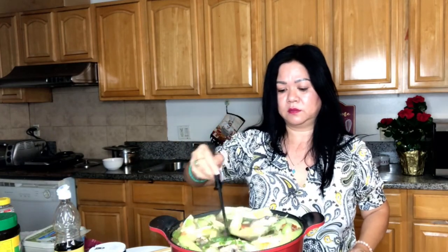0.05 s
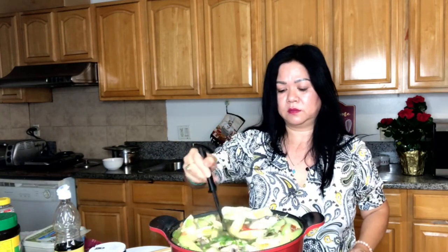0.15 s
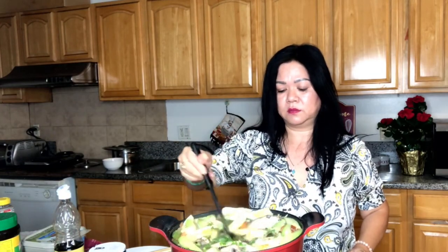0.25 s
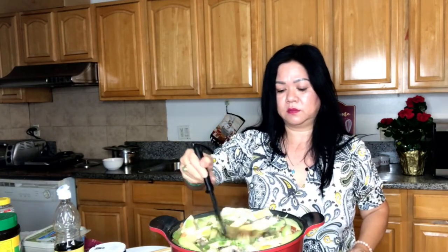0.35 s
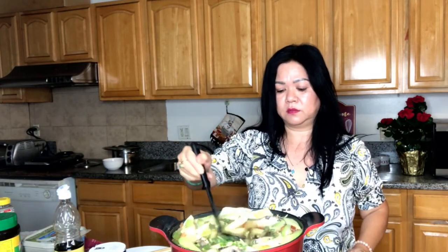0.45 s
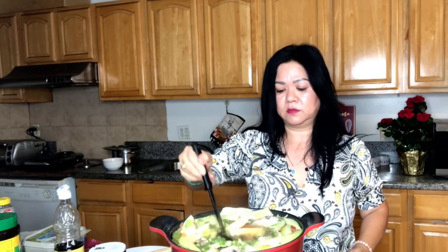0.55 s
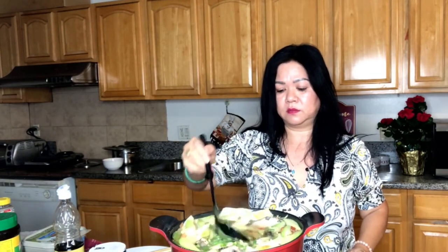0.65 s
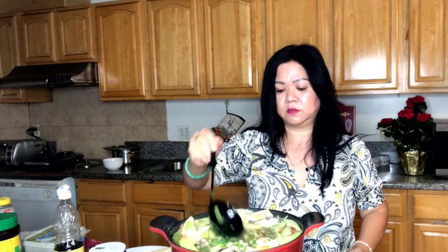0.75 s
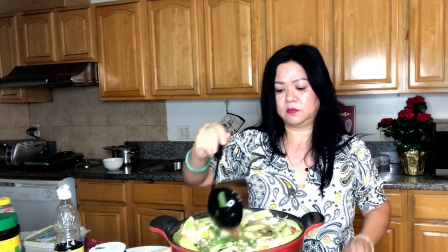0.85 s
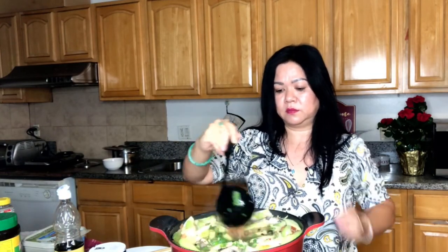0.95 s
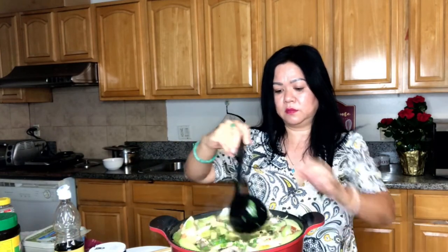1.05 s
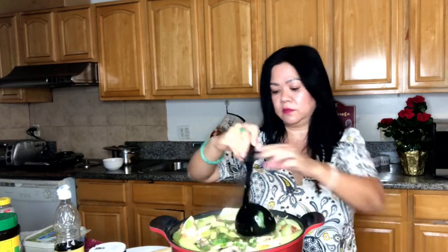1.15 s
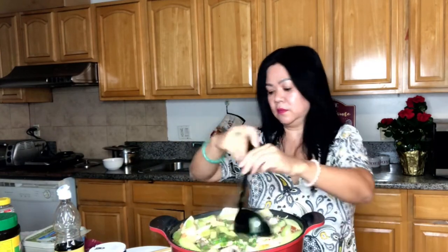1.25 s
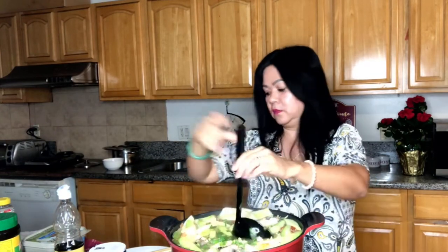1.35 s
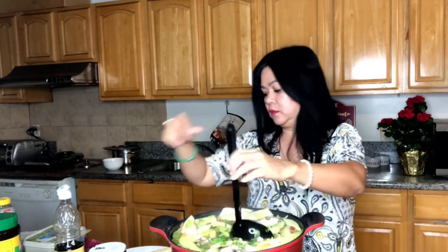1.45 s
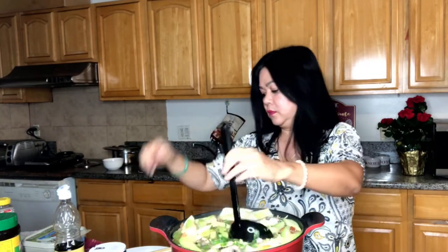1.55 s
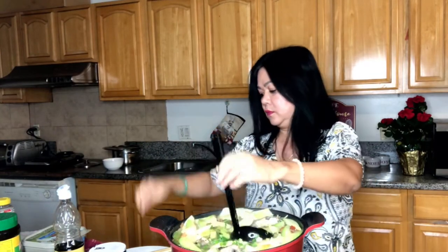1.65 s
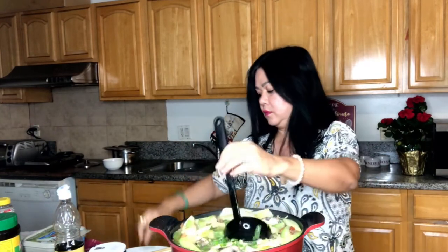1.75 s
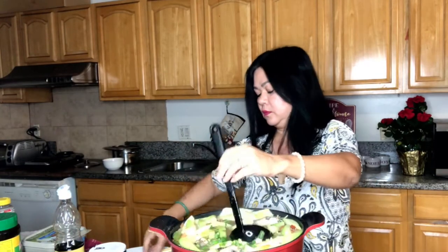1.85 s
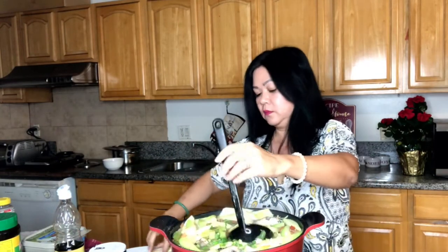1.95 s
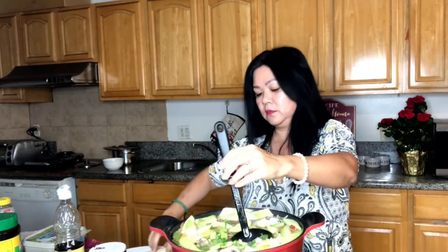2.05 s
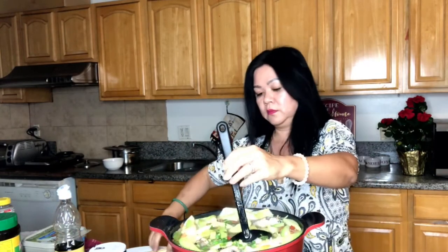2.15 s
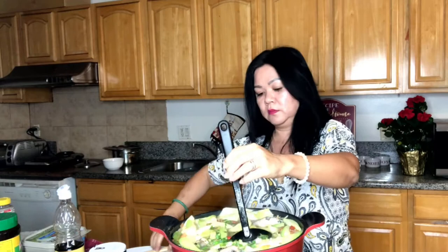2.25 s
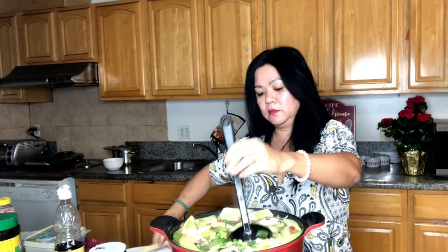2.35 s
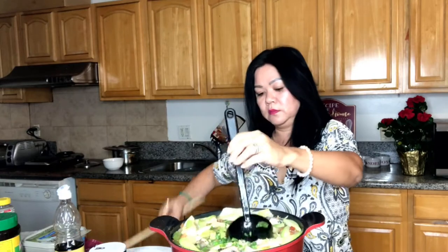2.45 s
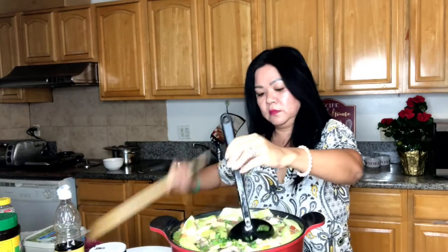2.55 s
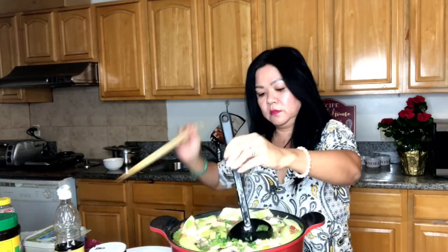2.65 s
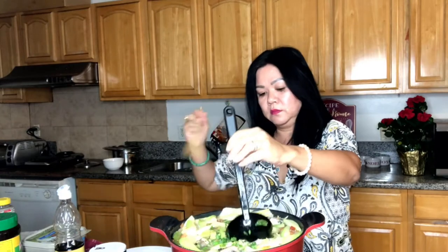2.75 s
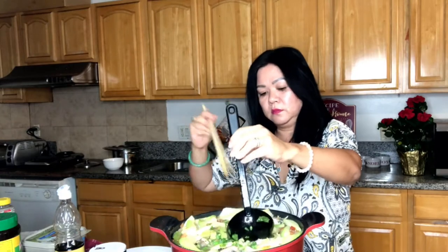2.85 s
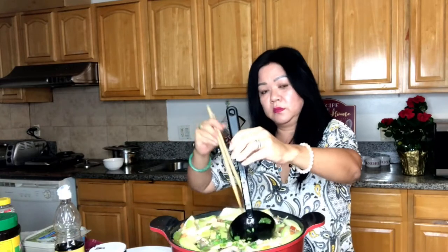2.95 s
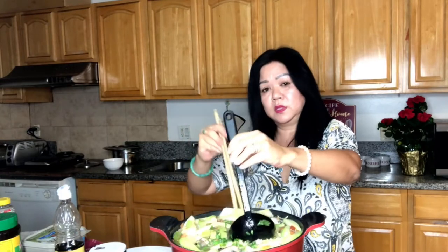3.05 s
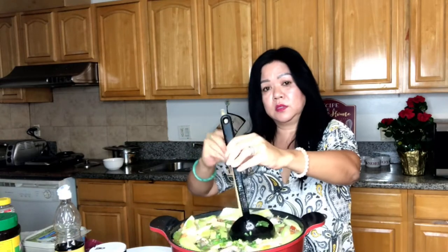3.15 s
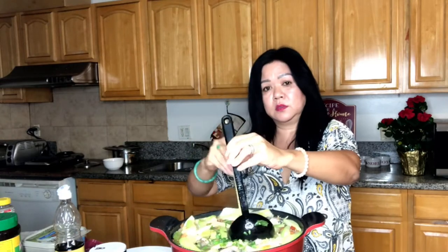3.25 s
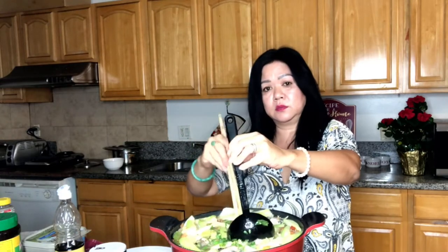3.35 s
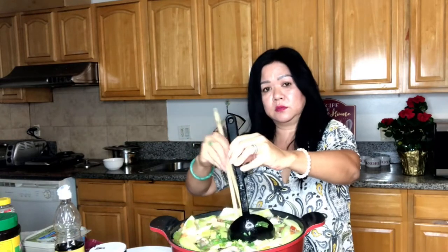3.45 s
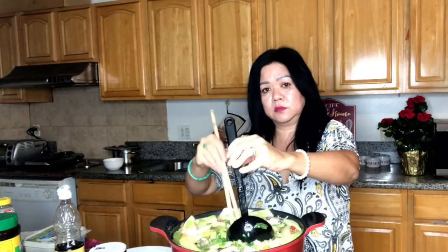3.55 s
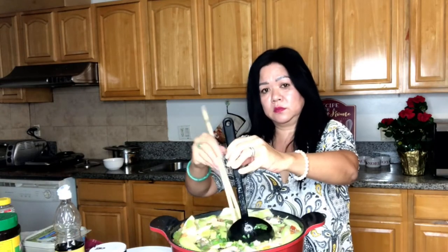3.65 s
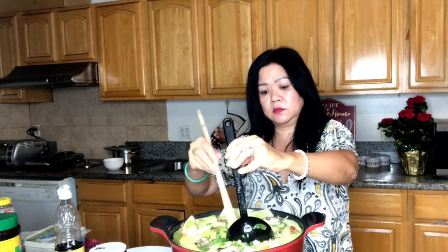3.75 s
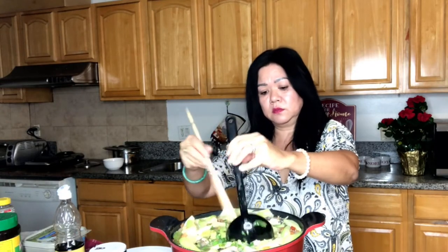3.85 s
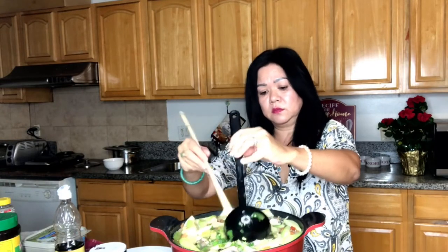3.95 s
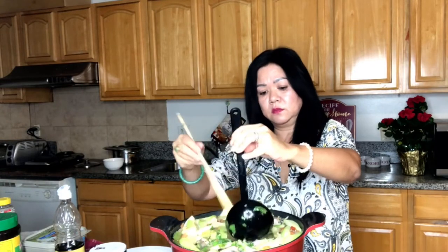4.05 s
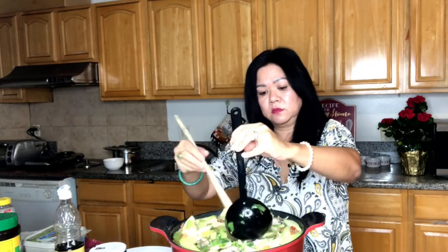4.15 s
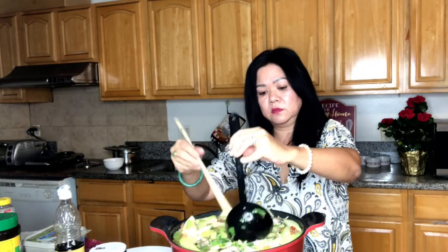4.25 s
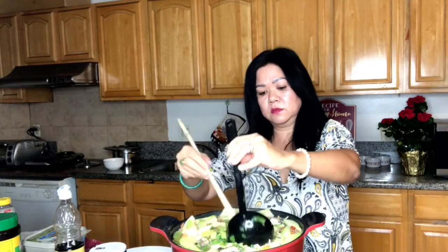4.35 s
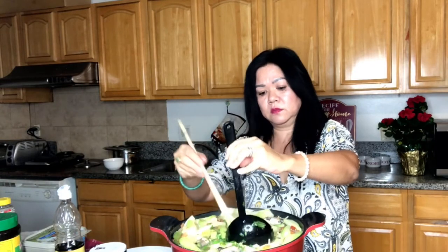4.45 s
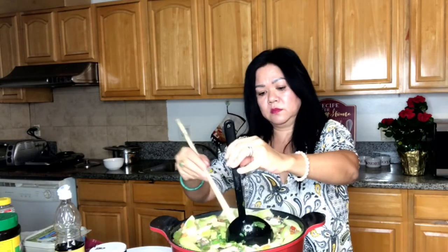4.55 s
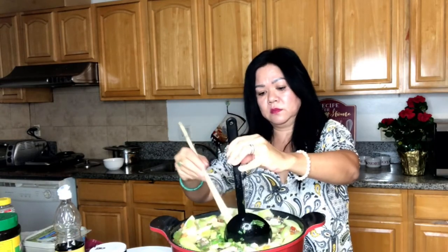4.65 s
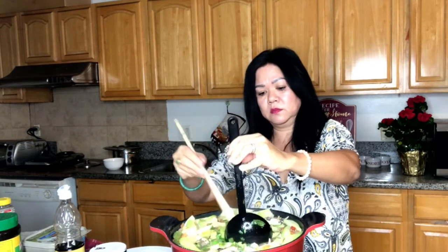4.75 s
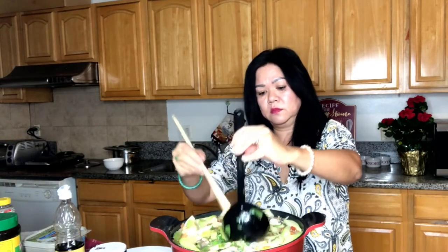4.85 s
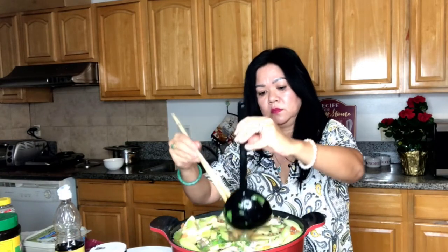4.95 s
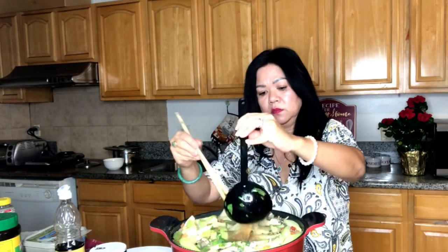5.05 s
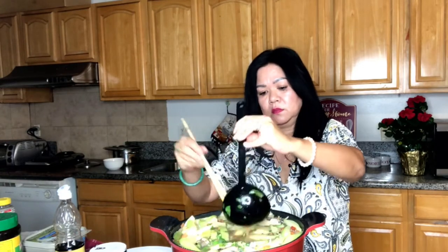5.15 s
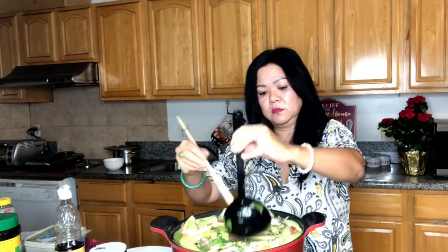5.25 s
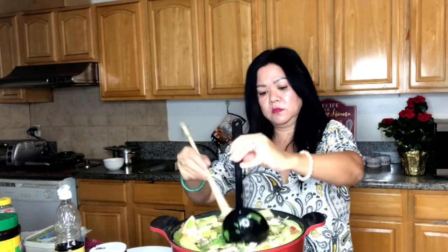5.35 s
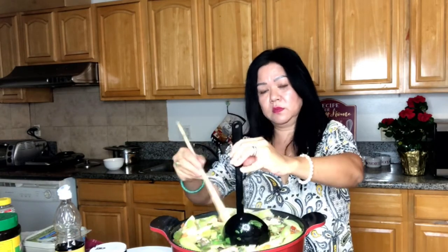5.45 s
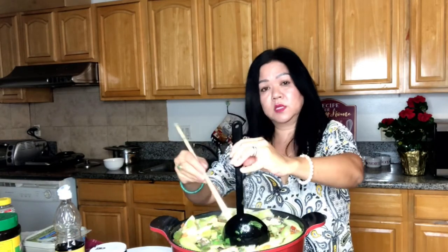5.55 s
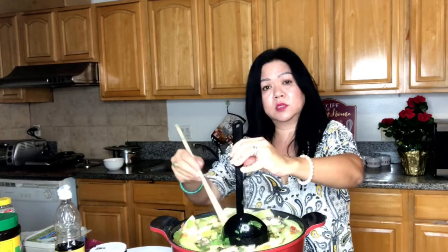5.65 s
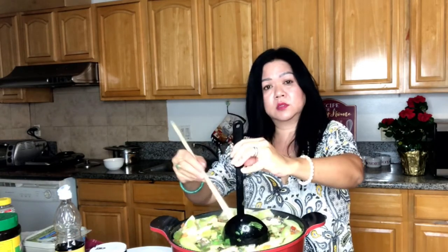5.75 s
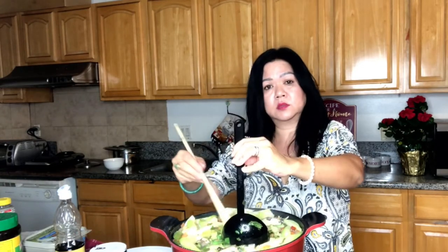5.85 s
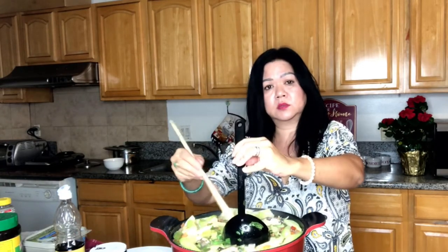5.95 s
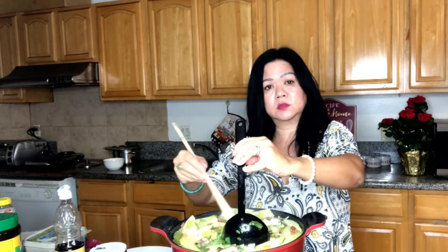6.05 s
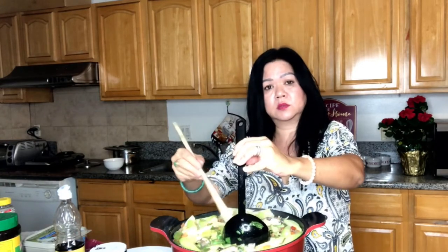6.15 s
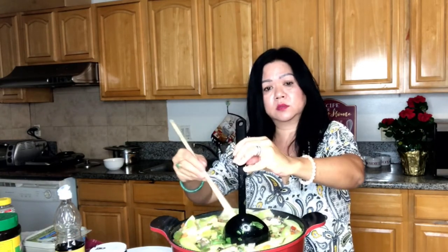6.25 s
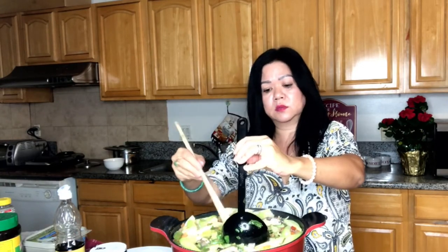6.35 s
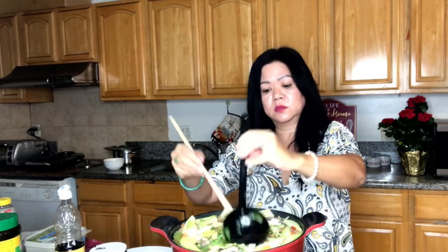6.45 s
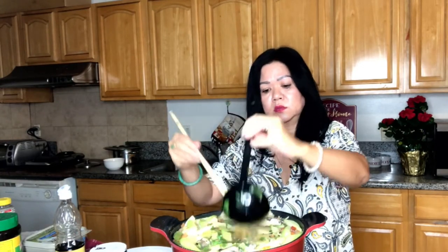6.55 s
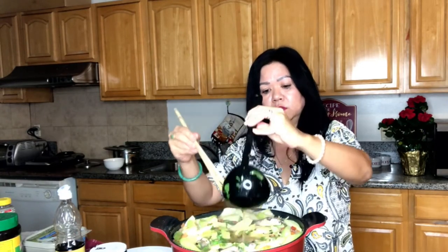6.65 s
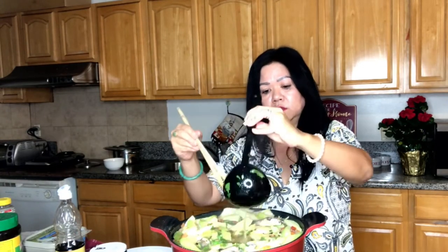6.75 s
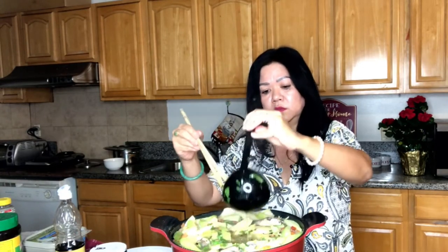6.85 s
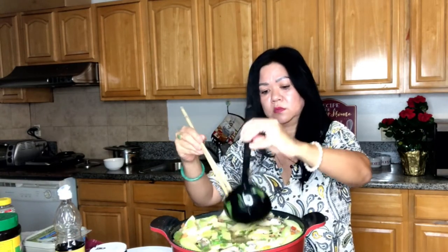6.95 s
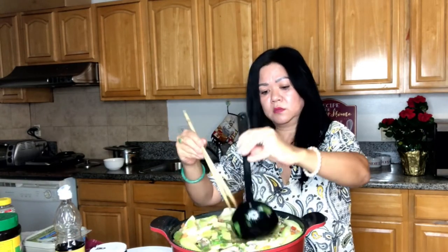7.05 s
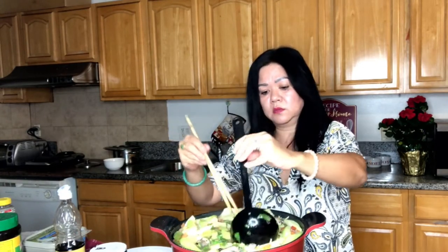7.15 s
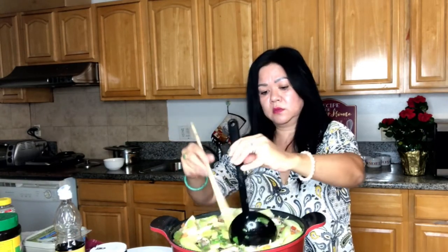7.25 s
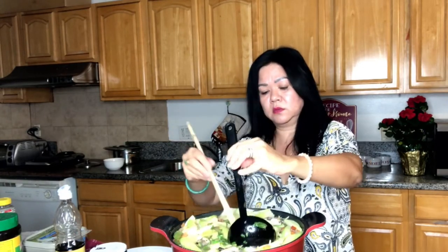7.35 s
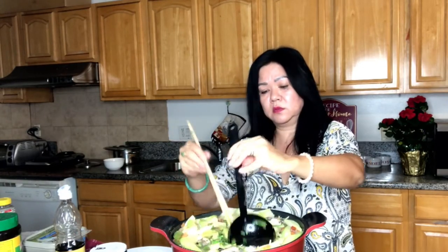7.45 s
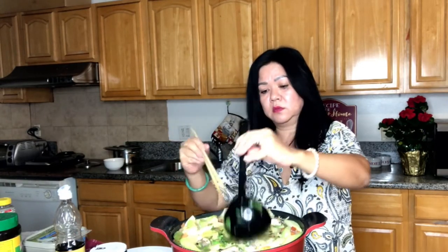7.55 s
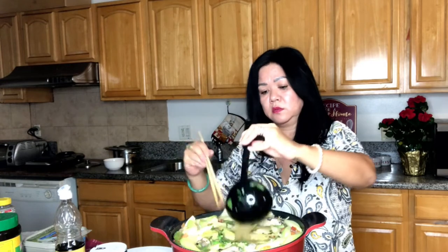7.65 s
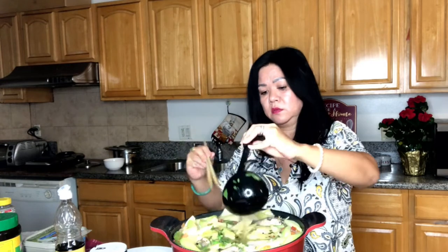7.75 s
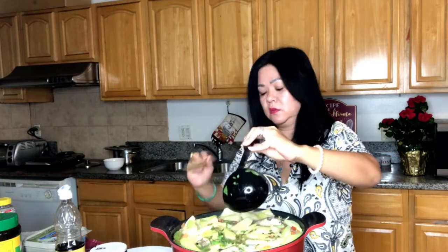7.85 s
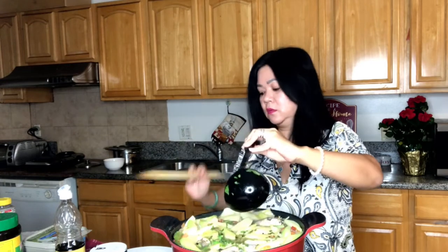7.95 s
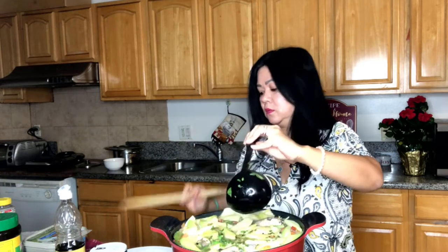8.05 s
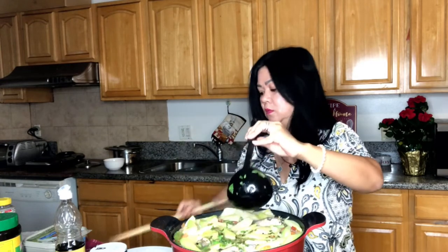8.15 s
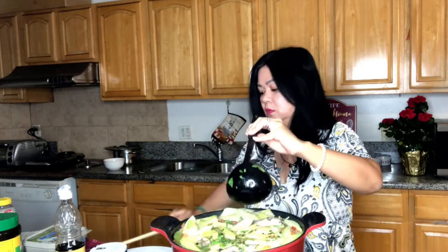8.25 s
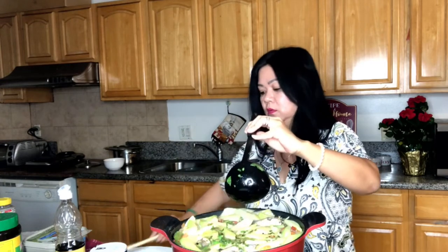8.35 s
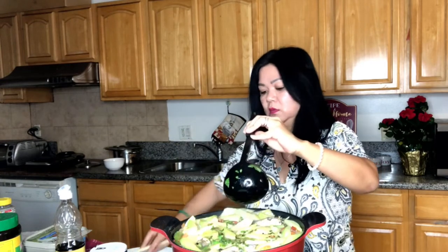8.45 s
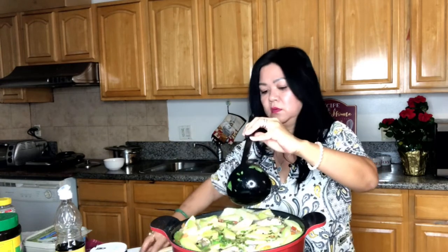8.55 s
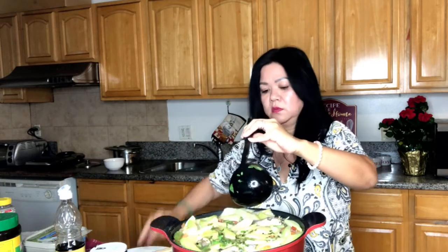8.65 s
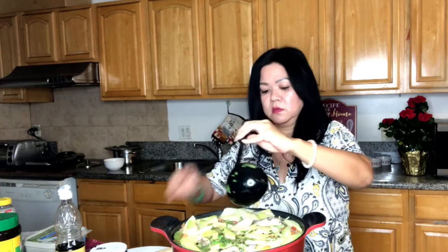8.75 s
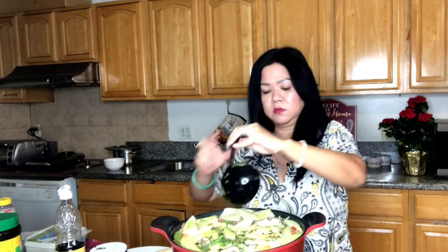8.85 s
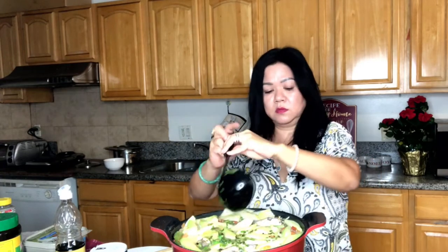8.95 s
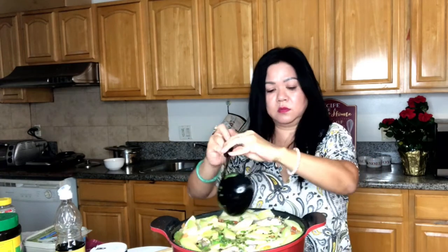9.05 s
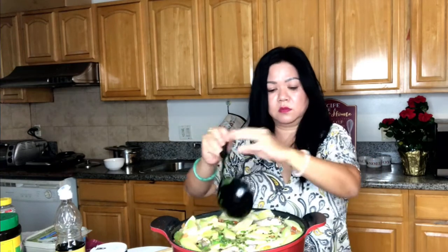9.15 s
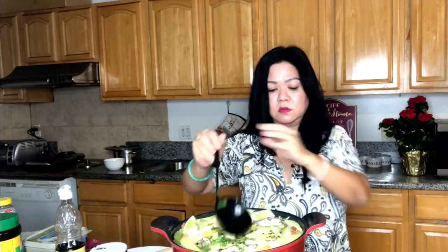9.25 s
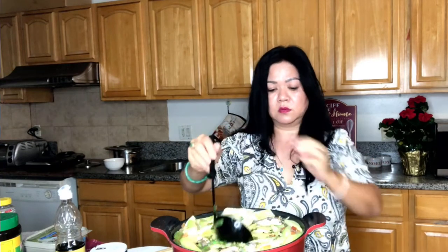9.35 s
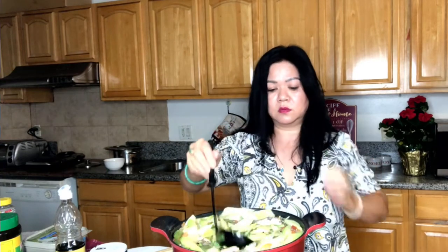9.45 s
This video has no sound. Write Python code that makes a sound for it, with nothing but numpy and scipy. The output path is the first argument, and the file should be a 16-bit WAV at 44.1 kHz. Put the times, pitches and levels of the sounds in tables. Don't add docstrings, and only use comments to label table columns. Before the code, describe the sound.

Wooden sticks clatter on a counter beside a ringing dish, then snap, knock and scrape a wet plastic ladle in a humming, tiled kitchen.

```python
import sys
import numpy as np
from scipy import signal
from scipy.fft import rfft, irfft, next_fast_len
from scipy.io import wavfile
from scipy.ndimage import uniform_filter1d

SR = 44100
rng = np.random.default_rng(int(sys.argv[2]) if len(sys.argv) > 2 else 0)


def wav_record(signal):
    frames = np.transpose(np.atleast_2d(signal))
    bounded = np.clip(frames, -1, 1)
    quanta = np.round(bounded * 32767).astype(np.int16)
    wavfile.write(sys.argv[1], SR, quanta)


def voltage_ratio(decibels):
    exponent = np.asarray(decibels, float) / 20
    return 10 ** exponent


N = 418509
T = np.arange(N) / SR
CLICK_HALF = 256
CONTACT_S = 0.00081

# (f/Hz, left minus right level/dB)
TICK_PAN = [(3000, 3.5), (12000, -5)]
# (t/s, low level/dB, middle level/dB, dish ring level/dB)
CLATTER = [(1.769, -47, -48, -59), (1.794, -38.5, -34.5, -43), (1.804, -35.5, -36.5, -49),
           (1.819, -37.5, -41, -48), (1.883, -30, -38, -47), (1.892, -36, -38.5, -42),
           (1.902, -52, -41.5, -51), (1.912, -52, -54, -55), (2.036, -46, -53, -64),
           (2.079, -43.5, -43.5, -53), (2.202, -45.5, -38.5, -48.5), (2.231, -43.5, -50, -56),
           (8.258, -36, -35.5, -39), (8.396, -62.5, -56.5, -52.5), (8.4073, -33.5, -19, -21.5),
           (8.413, -28, -28, -31), (8.42, -31, -30, -22.5), (8.4242, -35, -39, -30.5),
           (8.437, -40.5, -31.5, -34), (8.449, -32, -37, -28), (8.468, -38, -43, -39.5),
           (8.431, -36, -37, -30.5), (8.486, -42, -35, -42), (8.509, -54, -52, -41), (1.758, -59, -60, -62),
           (1.776, -53, -51, -64), (1.798, -37, -33, -47), (1.825, -43, -45, -50), (1.84, -48, -52, -54),
           (1.897, -39, -43, -46)]
LANDING_ENDS_S = [1.87, 2.0, 2.15, 3, 8.39, 8.43]


def unit(x):
    return x / np.sqrt(np.mean(x ** 2))


def along_hz(table, hz):
    points = np.array(table)
    return np.interp(np.log(hz + 1), np.log(points[:, 0]), points[:, 1])


def resonance(x, hz, width_hz):
    return signal.lfilter(*signal.iirpeak(hz, hz / width_hz, fs=SR), x)


def double_resonance(x, hz, width_hz):
    return resonance(resonance(x, hz, width_hz), hz, width_hz)


def die_away(t, t60_s):
    return np.exp(-np.log(1000) * t / t60_s)


def walk(rate):
    hold = int(SR / 32 / rate)
    steps = np.repeat(rng.standard_normal(N // (32 * hold) + 2), hold)
    coarse = uniform_filter1d(uniform_filter1d(steps, hold), hold)
    return np.interp(np.arange(N) / 32, np.arange(len(coarse)), unit(coarse))


def add(track, s, sound, pan_db):
    i = int(s * SR)
    sound = sound[..., :N - i]
    track[:, i:i + sound.shape[-1]] += sound * voltage_ratio([[pan_db / 2], [-pan_db / 2]])


def add_click(track, s, sound, pan_db):
    add(track, s - CLICK_HALF / SR, sound, pan_db)


def ring(modes, push, detune, length, grip_db=0., grip_s=.01, rock=0., contact_s=CONTACT_S):
    t = np.arange(int(length * SR))[:, None] / SR
    hz, db, t60 = np.transpose(modes)
    pitch, phase, speed, side = rng.standard_normal((4, len(hz)))
    build_up = 1 - np.exp(-t / contact_s)
    decay = die_away(t, t60) * voltage_ratio(grip_db * np.exp(-t / grip_s)) * build_up
    decay = decay * (1 - rock * np.sin(np.pi * (24 + 7 * speed) * t + .3 * phase) ** 2)
    waves = voltage_ratio(db) * decay * np.sin(2 * np.pi * hz * (1 + detune * pitch) * t + 2 * phase)
    ears = voltage_ratio(np.outer([.5, -.5], 6 * side))
    return signal.lfilter(push, 1., ears @ waves.T)


def click(hz, turns, upper_db, chatter_db, chatter_s):
    t = np.arange(-CLICK_HALF, 2 * CLICK_HALF) / SR
    wave = 0
    for k, ratio in enumerate([1, 1.55, 2.3, 3.6]):
        if ratio * hz < 15500:
            swell = np.exp(-(t * hz * ratio ** 0.31 / turns) ** 2)
            wave = wave + voltage_ratio(k * upper_db) * swell * np.sin(2 * np.pi * ratio * hz * t + k + 1.0)
    chatter = unit(double_resonance(rng.standard_normal(len(t)), hz, 1.2 * hz))
    chatter = chatter * np.exp(-np.abs(t) / chatter_s) * (t > 0)
    return wave / np.abs(wave).max() + voltage_ratio(chatter_db) * chatter


def fan():
    # (f/Hz, level/dB per Hz)
    colour = [(26, -33), (40, -1), (80, -4.5), (125, -7.5), (170, -2.5), (340, 3.5), (420, -3), (680, -2.5),
              (1450, -5), (2050, -12), (2350, -21.5), (11600, -31.5), (15300, -39), (16400, -49)]
    # (f/Hz, likeness 0-1)
    likeness = [(60, .8), (130, 0.1), (290, 0.67), (640, 0.2), (1410, 0.45), (3100, 0.54), (6820, 0.51),
                (15000, 0.5)]
    # (f/Hz, left minus right level/dB)
    balance = [(60, -1), (110, 10), (200, -3), (380, 1.5), (700, 1.5), (1290, -0.5), (2380, -0.5),
               (4400, 1), (8120, 0.5), (15000, -10)]
    level_db = -52
    long = next_fast_len(N)
    hz = np.fft.rfftfreq(long, 1 / SR)
    like = np.clip(along_hz(likeness, hz), 0, .99)
    mid, side = rfft(rng.standard_normal((2, long))) * voltage_ratio(along_hz(colour, hz))
    sign = np.array([[1], [-1]])
    pair = np.sqrt(1 + like) * mid + sign * np.sqrt(1 - like) * side
    pair = pair * voltage_ratio(sign * along_hz(balance, hz) / 2)
    return voltage_ratio(level_db + .3 * walk(2)) * unit(irfft(pair, long)[:, :N])


def motors():
    # (f/Hz, level/dB)
    hum = [(37.7, -74), (59.2, -64), (118.4, -69), (140.0, -73), (355.3, -69), (527.6, -69), (651.4, -71),
           (683.7, -71), (936.7, -72), (1314, -70.5), (1486, -74)]
    mains_hz, mains_db = 59.8, -75.5
    beat_s, beat_peak_s, beat_depth = 4.34, 2.76, 3.07
    lines = 0
    for hz, db in hum:
        if abs(hz - mains_hz) > 3:
            lines = lines + voltage_ratio(db + 0.5 * walk(2.8)) * np.sin(2 * np.pi * hz * T + 1.08 * walk(1.11))
    beat = 1 + beat_depth * np.cos(2 * np.pi * (T - beat_peak_s) / beat_s)
    mains = voltage_ratio(mains_db) * beat * np.sin(2 * np.pi * mains_hz * T)
    return np.sqrt(2) * (lines + mains) * voltage_ratio([[.8], [-.8]])


def simmer():
    size_db = 2.9 * np.minimum(rng.exponential(size=N), 2.5)
    pops = (rng.random(N) < 60 / SR) * voltage_ratio(-52.0 + size_db)
    return resonance(pops, 7100, 11000) * voltage_ratio([[.5], [-.5]])


def scrape():
    # (start t/s, rise/s, level/dB, fall/s, grit level/dB)
    strokes = [(0.0, 0.0034, -55, 0.06, -26), (0.82, .1, -76, .2, -2), (2.995, 0.042, -50, 0.076, -14),
               (3.2, 0.025, -61, 0.1, -30), (3.27, 0.031, -57.5, 0.1, -13), (3.425, 0.044, -45, 0.1, -27),
               (3.625, 0.019, -40.5, 0.089, -13), (3.81, 0.039, -42.5, 0.092, -36),
               (4.005, 0.025, -50, 0.11, -22), (4.03, 0.025, -43.5, 0.088, -32),
               (4.176, .005, -48, 0.066, -20), (4.35, 0.0041, -47, 0.044, -8),
               (4.705, .005, -48, 0.063, -23), (3.8, 0.0055, -44, 0.067, -27), (0.05, 0.091, -71, 0.69, -6),
               (4.185, 0.063, -43.5, 0.08, -18), (4.37, 0.05, -42.5, 0.058, -19),
               (4.54, 0.062, -45.5, 0.09, -26), (4.75, 0.015, -46, 0.067, -7),
               (5.061, 0.048, -50, 0.11, -18), (5.225, .015, -47, 0.15, -2.5),
               (5.405, 0.024, -49.5, 0.12, -6), (5.58, 0.011, -43.5, 0.11, -9),
               (5.76, 0.03, -54.5, 0.14, -14), (5.93, .01, -56, 0.12, 5), (6.07, 0.084, -53.5, .06, -24),
               (6.262, .04, -50, 0.096, -28), (7.15, 0.0095, -49.5, 0.12, -23), (7.6, 0.03, -67, .2, 2),
               (9.14, 0.031, -66, .08, 2), (9.38, 0.054, -64, 0.11, -12)]
    # (f/Hz, width/Hz, level/dB)
    bowl_modes = [(1400, 1100, 18), (2610, 830, 16.5), (3800, 2000, 19), (5150, 630, 11), (5970, 440, 4.5),
                  (3670, 160, 8), (4150, 330, 10), (6950, 280, 5), (3170, 230, 6), (11500, 1400, -1)]
    start_db, end_db = -10.5, -24
    level, top_db = np.zeros((2, N))
    for s, rise_s, db, fall_s, grit_db in strokes:
        span = slice(max(int(s * SR), 0), int((s + rise_s + 1.5 * fall_s) * SR))
        after = T[span] - s - rise_s
        shape_db = np.where(after < 0, -start_db * after / rise_s, end_db * after / fall_s)
        stroke = voltage_ratio(db + shape_db)
        top_db[span] = np.where(stroke > level[span], grit_db, top_db[span])
        level[span] = np.maximum(level[span], stroke)
    level = uniform_filter1d(level, int(0.0068 * SR))
    uneven = voltage_ratio(1.8 * rng.exponential(size=N) + 1.8 * walk(150))
    slips = (rng.random(N) < .2) * rng.standard_normal(N) * uneven
    bowl = sum(voltage_ratio(db + 5.5 * walk(18)) * unit(resonance(slips, hz, width)) for hz, width, db in bowl_modes)
    grit = resonance(resonance(slips, 8600, 7000), 9100, 6600) * voltage_ratio(1.8 * walk(27))
    return level * voltage_ratio(-2.5) * (unit(bowl) + voltage_ratio(top_db) * unit(grit)) * voltage_ratio([[.6], [-.6]])


def drops(track):
    # (t/s, peak/dB, f/Hz)
    lone = [(0.1823, -39, 3200), (0.281, -49, 3790), (0.3286, -45, 5490), (0.3465, -46, 12860),
            (0.3796, -50, 9580), (0.4867, -43, 11950), (0.6082, -48, 4460), (0.7161, -44, 2600),
            (0.8487, -36, 3080), (0.8575, -40, 2800), (0.8575, -44, 12000), (0.9005, -29.5, 2700),
            (0.93, -39, 11500), (0.969, -38, 4860), (1.1372, -46, 3080), (1.477, -42, 11000),
            (2.504, -42, 2980), (6.36, -36, 2920), (6.6305, -44.5, 2950), (6.7724, -42.5, 3160),
            (6.9542, -38.5, 9710), (7.1489, -33.5, 2780), (7.635, -38.5, 3800), (7.6735, -35, 13110),
            (7.6939, -42.5, 5150), (9.1706, -43, 3200), (9.1754, -40, 5630), (9.214, -49, 2800),
            (9.3946, -48, 4100), (9.458, -38, 2030), (0.058, -47, 10500), (0.51, -43, 9500),
            (0.565, -44, 6640), (0.8965, -35, 4300), (0.9264, -37, 2610), (0.9593, -37, 9000),
            (3.965, -48, 13000), (4.131, -42, 12000), (4.865, -52, 13500), (4.872, -48, 10000),
            (4.911, -52, 13500), (4.94, -49, 10000), (4.978, -43.5, 4000), (4.9866, -42, 9000),
            (5.1976, -43, 5150), (8.063, -54, 11000), (8.238, -53, 13000)]
    # (start t/s, length/s, level/dB, f/Hz)
    trickles = [
        (0.2, .27, -53, 9000),
        (7.635, .085, -47.5, 5970),
    ]
    runs = []
    for s, length, db, hz in trickles:
        for when, size, pitch in rng.random((6, 3)):
            runs.append((s + length * when, db + 12 * (size - .5), hz * 2 ** (1.2 * (pitch - .5))))
    for s, db, hz in lone + runs:
        add_click(track, s, voltage_ratio(db - 4.0) * click(hz, 0.84, -16.0, -13.0, 0.0019), along_hz(TICK_PAN, hz))


def films(track):
    # (t/s, peak/dB, f/Hz)
    tears = [(0.064, -50, 11500), (0.182, -48, 12000), (0.281, -50, 9000), (0.332, -52, 10500),
             (0.82, -49, 6200), (0.849, -52, 11000), (0.8865, -47, 4000), (0.893, -46, 5500),
             (0.892, -50, 12000), (0.898, -45, 9000), (0.905, -43, 4200), (0.9275, -42, 9000),
             (0.935, -46, 10000), (0.947, -46, 8000), (0.9685, -42, 11500), (5.737, -41, 3700),
             (5.738, -47, 9000), (5.751, -46, 5400), (5.7945, -45, 3000), (5.838, -48, 11000),
             (5.847, -42, 2800), (5.867, -50, 9000), (0.861, -49, 6500), (6.1685, -45, 1800)]
    for s, db, hz in tears:
        add_click(track, s, voltage_ratio(db - 1.0) * click(hz, 0.8, -10.0, -14.0, 0.0015), along_hz(TICK_PAN, hz))


def squeaks(track):
    # (t/s, peak/dB, f/Hz)
    slips = [
        (0.861, -38.5, 4300),
        (0.9625, -44, 4970),
        (4.7055, -35, 6400),
        (4.71, -35, 6000),
        (4.75, -30, 5400),
        (4.751, -34, 7200),
        (4.769, -33, 6000),
    ]
    for s, db, hz in slips:
        add_click(track, s, voltage_ratio(db - 4.0) * click(hz, 3.6, -25.0, -12.0, 0.0032), .9)


def whine():
    # (start t/s, end t/s)
    spells = [(.9, 1.3), (1.5, 3.25), (3.93, 4.2), (4.4, 4.52), (4.66, 4.8), (6.7, 6.82), (6.9, 6.98),
              (7.24, 7.3), (7.39, 7.99), (8.93, 9.49)]
    # (f/Hz, width/Hz, level/dB)
    bands = [(7050, 200, -87), (8350, 250, -83), (12350, 200, -86), (12870, 300, -79)]
    on = sum((T > start) * (T < end) * 1. for start, end in spells)
    on = uniform_filter1d(on, int(.02 * SR))
    tone = 0
    for hz, width, db in bands:
        tone = tone + voltage_ratio(db) * unit(double_resonance(rng.standard_normal(N), hz, width))
    return on * tone * voltage_ratio([[.8], [-.8]])


def stick_clatter(counter):
    stick_hz = np.array([292, 325, 525, 715, 872, 920, 1020, 1170, 1350, 1412, 1512, 1580, 1850])
    stick_t60 = [0.074, 0.11, 0.069, 0.06, .069, 0.069, 0.1, .056, 0.043, 0.056, .044, 0.036, 0.064]
    places = [
        [-2, -20, -10, 7, 0, -3, -3, 0.5, 0, -16, 1, -28, -2.5],
        [-23, -16, -5, 2.5, -8, -7, -3, -2, 2, -24, 4, -32, -1],
        [-4, -11, -5, 0.5, 0.5, 1.5, -3, 0, 1, -13, 0, -20, -1],
        [-3, -13, 0, 1, -7, -1, 3, -14, -15, -13, -3.5, -21.5, -5],
        [-23, -25.5, -3, -1.5, -2.5, -12.5, -0.5, -9, -8, -16, -2, -24, -1.5],
        [-3.5, -11, 1, 0.5, 3, 4.5, -7, -8.5, -1, -3, 2.5, -2, -8.5],
        [-3, -11.5, -8.5, 4, 6.5, 1, -3.5, -5, -5.5, -9, -4.5, -6, -17.5],
    ]
    for s, low_db, middle_db, _ in CLATTER:
        place = np.searchsorted(LANDING_ENDS_S, s)
        share_db = places[place] + np.where(stick_hz < 1100, low_db, middle_db)
        modes = np.c_[stick_hz, share_db, np.minimum(stick_t60, .06)]
        add(counter, s, ring(modes, [1.], 0.0053, length=.1), 1.8)


def counter_rattle(counter):
    # (f/Hz, t60/s, left minus right level/dB)
    groups = [(466, 0.053, 1.5), (1500, 0.085, -3), (3500, 0.067, 0.5), (7550, 0.056, -2.5)]
    t = np.arange(int(.15 * SR)) / SR
    for s, low_db, middle_db, ring_db in CLATTER:
        high_db = ring_db - 1.5
        top_db = high_db - 10.0 + 1.3 * (ring_db + 24.0)
        levels_db = [low_db - 4.0, middle_db - 4.5, high_db, top_db]
        for (centre, t60, pan_db), level_db in zip(groups, levels_db):
            noise = unit(double_resonance(rng.standard_normal(len(t)), centre, 1.0 * centre))
            shape = die_away(t, t60) * (1 - np.exp(-t / CONTACT_S))
            add(counter, s, voltage_ratio(level_db) * noise * shape, pan_db)


def dish_ring(dish):
    dish_hz = [2337, 2371, 2721, 2756, 2915, 3386, 3709, 3783, 3825, 4070, 4370, 4905, 5055, 5430, 6195,
               6940, 7632, 9100, 3946, 8540]
    dish_t60 = [.18, .28, .42, .22, .18, .33, 0.47, .2, .2, .22, .22, .25, .25, .18, .18, .2, .36, .15, .16,
                .09]
    places = [
        [0, -12, -0.5, -21, -16, -9, -16, -21, -11, -20, -8, -14, -35, -14, -16, -30, -32, -44, -7, -19],
        [-5, -11, -2.5, -25, -27, -1.5, -4, -8, -16, -19, -16, -16, -31, -14, -27, -34, -43, -43, -5, -26],
        [-3, 0, 3, -1, -24, -6, -6, -5, -30, -18, -17, -8, -13, -32, -20, -26, -35, -28, -15, -40],
        [-30, -33, 3, 7.5, -18, -12, -7, -9, -22, -35, -19, -8, -17, -42, -17, -44, -36, -25, -17, -33],
        [-25, -28.5, 0, -2, -12, -11.5, 1.5, -7.5, -2.5, -18.5, -15.5, -4.5, -40.5, -38.5, -15, -30, -19.5,
         -47.5, -21.5, -30],
        [-6.5, -29.5, -3.5, -6.5, -8, -8, -12, -11, -4.5, -22, -7.5, 1, -19, -13.5, -18, -27, -18.5, -43, -13,
         -39],
        [-10, -2.5, -5, -17, -13, -14.5, -13, -15.5, -16, -12, -14, -10.5, -8, -18, -30, -31, -18.5, -38, -16,
         -42],
    ]
    for s, _, _, ring_db in CLATTER:
        place = np.searchsorted(LANDING_ENDS_S, s)
        modes = np.c_[dish_hz, np.add(places[place], ring_db - 2.5), dish_t60]
        length = .4 if ring_db > -28 else .2
        add(dish, s, ring(modes, [1.], 0.00055, length, grip_db=8.0, grip_s=0.017, rock=0.84), 1.4)


def bracelet(track):
    # (t/s, peak/dB, left minus right level/dB)
    tinkles = [
        (2.043, -43, -6),
        (2.118, -50, -6),
        (2.138, -31.5, -5),
        (2.151, -33, -5),
        (2.204, -42, -5),
        (2.249, -42, -6),
    ]
    # (f/Hz, level/dB, t60/s)
    beads = [(8800, -19, 0.05), (10500, -5.5, 0.11), (10200, -4.5, .04), (12000, -14, .04),
             (13900, -10, .03), (15600, -10, .03)]
    for s, db, pan_db in tinkles:
        shake = rng.standard_normal(90) / 8.5
        sound = ring(beads, shake, 0.0043, length=.2, contact_s=.0002, rock=.6)
        add(track, s, voltage_ratio(db - 14.5) * sound, pan_db)
        add_click(track, s, voltage_ratio(db - 11.0) * click(10200, 2.0, -4, -14.0, 0.004), pan_db)


def snaps(track):
    # (t/s, peak/dB, f/Hz)
    hits = [(2.996, -46, 3500), (3.0123, -42, 5010), (3.581, -48, 5500), (3.642, -34, 6000),
            (4.0205, -43, 3740), (4.5907, -38, 3600), (5.8369, -40, 5180), (6.1582, -46, 4200),
            (3.994, -38, 2590), (3.4194, -40, 4500), (3.047, -35, 5230), (3.426, -47, 4330),
            (3.438, -43, 5150), (3.486, -38, 5490), (3.6152, -42, 4390), (3.6187, -13.5, 6200),
            (3.798, -27, 4100), (3.7991, -26, 5650), (3.805, -25.5, 6000), (4.175, -34, 3820),
            (4.177, -23.5, 5200), (4.3502, -26.5, 4970), (4.354, -38, 6000), (4.432, -40, 3700),
            (4.5278, -25.5, 6000), (4.5344, -23.5, 5900), (4.7045, -31.5, 4600), (4.7105, -38, 5900),
            (4.749, -35, 3180), (4.7205, -45, 6600), (5.2187, -18, 5440), (5.22, -29, 11820),
            (5.223, -31, 10600), (5.394, -40, 3790), (5.3988, -18, 5870), (5.5685, -21.5, 6500),
            (5.5722, -18, 5800), (5.917, -31, 6140), (5.923, -14.5, 6050), (5.923, -19, 10500),
            (5.9175, -31, 9500), (5.926, -32, 5500), (6.088, -49, 3800), (6.26, -52, 9500),
            (6.0988, -38.5, 6100), (6.255, -32.5, 5200)]
    rebound_s, rebound_db = 0.0097, -22
    for s, db, hz in hits:
        for late_s, soft_db in [(0, 0), (rebound_s, rebound_db)]:
            add_click(track, s + late_s, voltage_ratio(db + soft_db) * click(hz, 1.28, -10.5, -12.5, 0.0023), .9)


def knocks(track):
    # (t/s, peak/dB, f/Hz)
    hits = [(3.4195, -32.5, 1010), (3.6143, -32.5, 1530), (3.6202, -38, 1940.0), (3.652, -52, 900.0),
            (3.709, -37, 1050), (3.7961, -32.5, 1150), (3.807, -40, 1400.0), (3.996, -33, 900.0),
            (4.175, -28.5, 1180), (4.3503, -29, 1510), (4.526, -30, 1440), (4.7043, -27, 1340),
            (5.2189, -25.5, 1400), (5.3947, -30, 920), (5.5512, -50, 1360.0), (5.568, -28.5, 1500),
            (5.7462, -32, 1025), (5.783, -35, 1270), (5.847, -39, 970.0), (5.916, -29, 1480),
            (5.9583, -39, 970.0), (6.062, -38, 1420), (6.167, -31.5, 1650), (6.174, -43, 840.0),
            (6.239, -38, 1310.0), (6.254, -26.5, 1490), (6.3065, -38, 800.0), (7.149, -32.5, 1330)]
    # (f/Hz, level/dB, t60/s)
    body = [(445, 5.5, 0.012), (587, 3.5, 0.013), (900, -2.5, 0.035)]
    for s, db, hz in hits:
        add_click(track, s, voltage_ratio(db - 6.5) * click(hz, 1.0, -16.5, -6.5, 0.007), 1.2)
        add(track, s, voltage_ratio(db - 15.0) * ring(body, [1.], 0.028, length=.05), 1.2)


def worktop_boom(track):
    # (f/Hz, level/dB, t60/s)
    boom = [(150, -47, 0.18), (82.5, -56.5, .3), (235, -57, .12)]
    add(track, 8.409, ring(boom, np.hanning(100) / 50, 0., length=0.28), 1.)


def walls():
    # (f/Hz, t60/s)
    room_t60 = [(200, 0.33), (1000, 0.35), (4000, 0.55), (12000, 0.17)]
    t = np.arange(int(.6 * SR)) / SR
    echo = 0
    for hz in 180 * 2 ** np.arange(7):
        noise = resonance(rng.standard_normal((3, len(t))), hz, hz / 1.17)
        echo = echo + noise * die_away(t, along_hz(room_t60, hz))
    echo = (echo[0] + 1.08 * echo[1:]) * (1 - np.exp(-t / 0.00014))
    return echo / np.linalg.norm(echo[0])


def room(dry, wet_db):
    return dry + voltage_ratio(wet_db) * signal.fftconvolve(dry, walls(), axes=1)[:, :N]


def scene():
    counter, near, dish = np.zeros((3, 2, N))
    bed = fan() + motors() + whine()
    broth = simmer() + scrape()
    for source in [drops, films, squeaks, bracelet, snaps, knocks]:
        source(near)
    stick_clatter(counter)
    counter_rattle(counter)
    dish_ring(dish)
    worktop_boom(dish)
    no_bass = signal.butter(2, 220, "high", fs=SR, output="sos")
    counter = signal.sosfilt(no_bass, counter)
    return room(counter, -4.5) + room(near + broth, -8.0) + room(dish, -12.5) + bed


def low_pass(x):
    return signal.sosfilt(signal.butter(12, 16540, fs=SR, output="sos"), x)


def record(dry):
    top = signal.ellip(6, .5, 40, 15650, fs=SR, output="sos")
    return low_pass(signal.sosfilt(top, dry))


dry = scene()
out = record(dry)
wav_record(out)
```